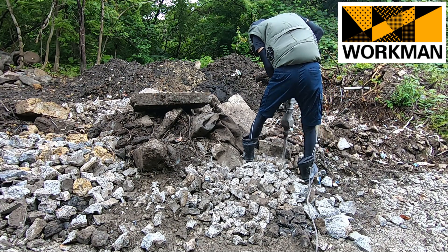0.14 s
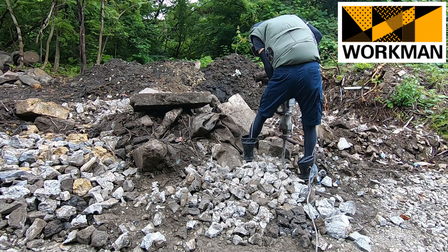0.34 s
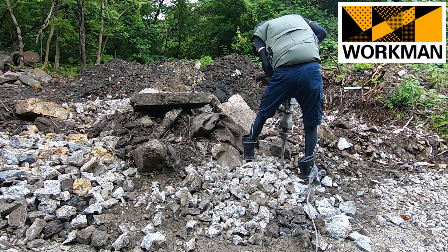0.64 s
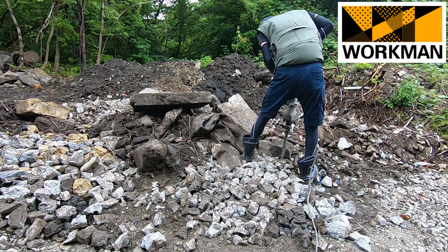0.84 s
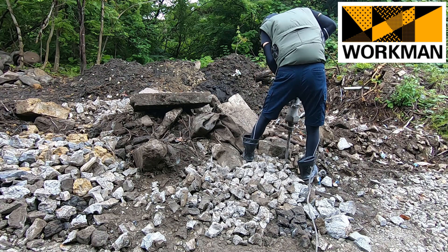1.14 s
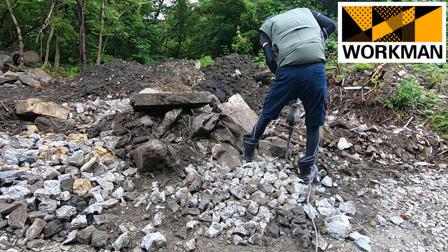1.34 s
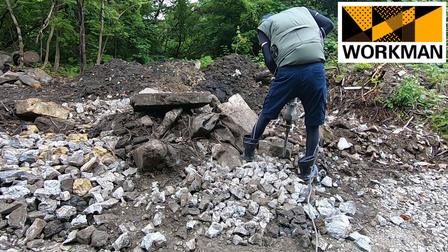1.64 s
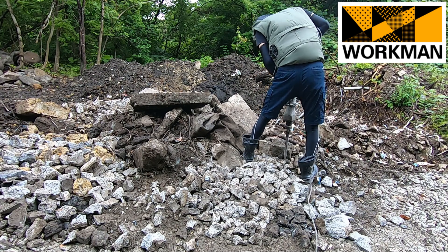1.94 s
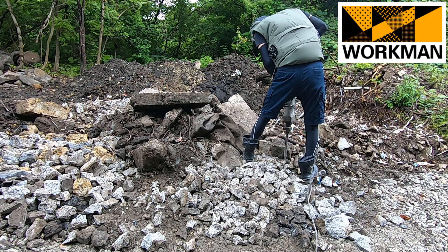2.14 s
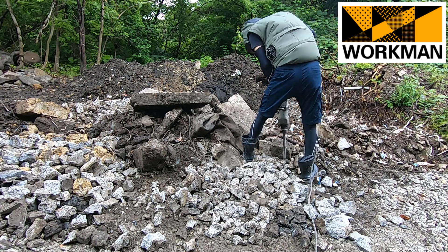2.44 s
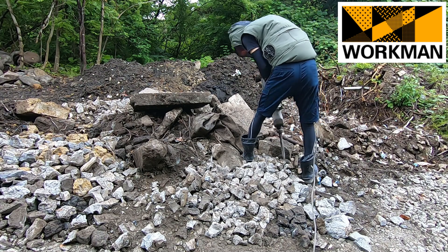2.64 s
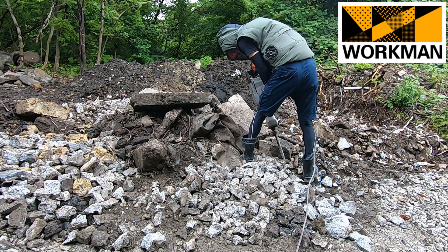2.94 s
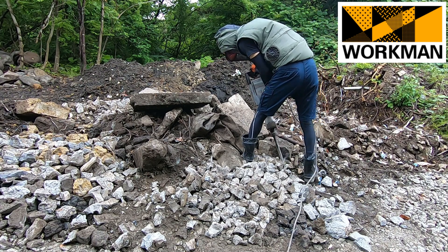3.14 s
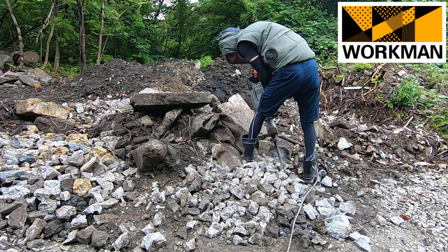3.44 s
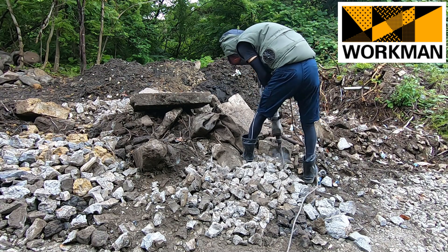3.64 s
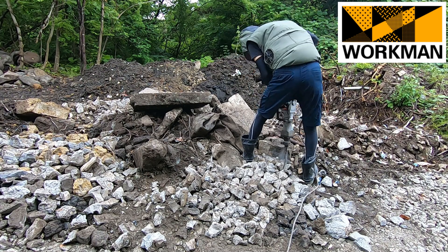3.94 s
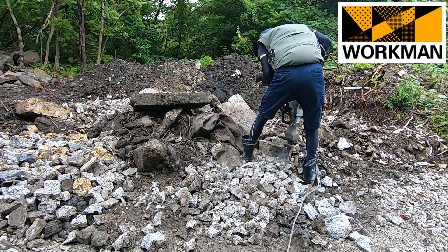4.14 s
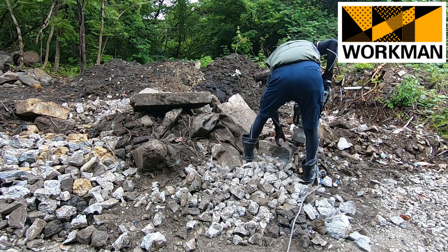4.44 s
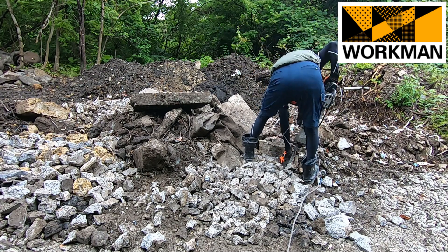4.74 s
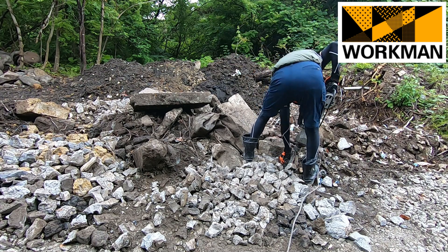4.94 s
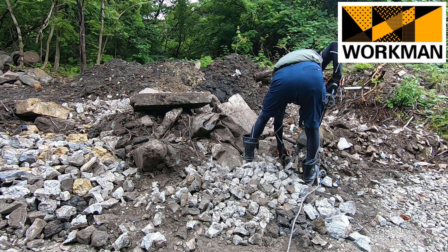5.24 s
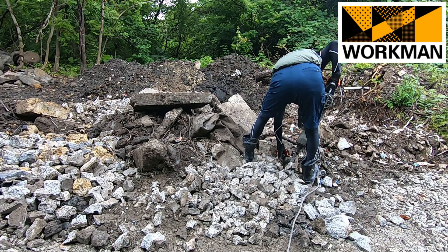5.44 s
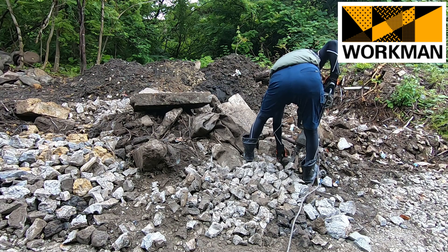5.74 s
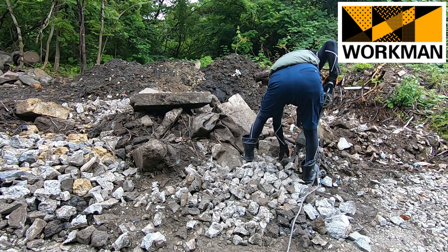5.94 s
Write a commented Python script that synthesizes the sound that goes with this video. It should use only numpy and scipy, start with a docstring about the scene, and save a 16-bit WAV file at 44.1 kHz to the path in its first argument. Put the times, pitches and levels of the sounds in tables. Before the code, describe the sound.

A demolition hammer cracks stone in two rapid bursts, its motor coasting down with spaced metallic knocks, over small fans whining in an outdoor rubble yard.

```python
"""Demolition hammer on stone

Two pulls of the trigger, the first already under way: the motor drives, strikes and coasts down in a rubble yard.
Each blow cracks on the stone, rings the chisel modes until the tip seats and thumps the ground.
Noise through gear case modes rattles, with fan rush, gear tones and growl; chips crackle as grain noise.
The fans of a cooling vest whine throughout, over background air; rubble and trees reflect the blows."""
import sys
import numpy as np
from scipy import signal
from scipy.fft import rfft, irfft
from scipy.io import wavfile

SR = 44100
rng = np.random.default_rng(int(sys.argv[2]) if len(sys.argv) > 2 else 0)


def log_audio(samples):
    """Write samples as a 16-bit WAV file to the path given in sys.argv[1]."""
    # one column per channel
    frames = np.atleast_2d(samples).T
    # limit to full scale, then quantise
    limited = np.clip(frames, -1, 1)
    pcm = np.round(limited * 32767).astype(np.int16)
    wavfile.write(sys.argv[1], SR, pcm)


N = 268992
TIME, FREQ = np.arange(N) / SR, np.fft.rfftfreq(N, 1 / SR)


def amp(db):
    """Decibels to amplitude."""
    return 10 ** (np.asarray(db) / 20)


def unit(x):
    """Scale to rms 1."""
    return x / np.sqrt(np.mean(x ** 2, -1, keepdims=True) + 1e-20)


def read(points, hz):
    """Read a (Hz, value) table along log frequency."""
    f, value = np.transpose(points)
    return np.interp(np.log(hz + 1), np.log(f + 1), value)


def curves(rows):
    """Each column after the first as a line through time."""
    s, *columns = np.transpose(rows)
    return [np.interp(TIME, s, c) for c in columns]


def colour(x, spectrum):
    """Filter by a (Hz, dB) table."""
    return irfft(rfft(x) * amp(read(spectrum, FREQ)), N)


def noise(spectrum):
    """Coloured noise of rms 1 as a (mid, side) pair."""
    return unit(colour(rng.standard_normal((2, N)), spectrum))


def drift(hz):
    """Smooth random curve of rms 1."""
    return unit(irfft(rfft(rng.standard_normal(N)) * np.exp(-(FREQ / hz) ** 2), N))


def flutter(hz):
    """Random curve of rms 1 in straight segments, rougher than drift."""
    knots = np.arange(0, N / SR + 1, 1 / 400)
    smooth = signal.lfilter([1], [1, -np.exp(-2 * np.pi * hz / 400)], rng.standard_normal(len(knots)))
    return unit(np.interp(TIME, knots, smooth))


def resonate(x, hz, width_hz):
    """One resonance driven by x, at rms 1."""
    return unit(signal.lfilter(*signal.iirpeak(hz, hz / width_hz, SR), x))


def add(mix, s, sound):
    """Add a sound in place from s seconds on."""
    part = mix[..., max(round(s * SR), 0):][..., :sound.shape[-1]]
    part += sound[..., :part.shape[-1]]


def grains(per_s, size_db, size_limit, decay_s):
    """Sparse decaying noise grains with exponentially spread dB levels."""
    size = np.minimum(rng.exponential(1, N), size_limit)
    snaps = (rng.random(N) < per_s / SR) * amp(size_db * size)
    envelope = signal.lfilter([1], [1, -np.exp(-1 / (decay_s * SR))], snaps)
    return envelope * rng.standard_normal((2, N))


# Pulls of the trigger. Each row: on in seconds, off in seconds, top speed in turns/s,
# coast-down time constant in seconds, time from off to standstill in seconds.
RUNS = [(-0.15, 0.603, 23.07, 2.054, 3.525), (2.873, 3.646, 22.0, 0.69, 2.1)]
SPIN_UP_S = 0.054
CREEP_PER_S = 0.46  # share of top speed
FULL_SPEED_HZ = 31.6  # reference crank speed


def crank_speed():
    """Turns/s: a jump and slow climb under power, then drag and friction brake the motor."""
    speed = np.zeros(N)
    for on, off, top, coast_s, stop_s in RUNS:
        spin_up = 1 - np.exp(-np.maximum(TIME - on, 0) / SPIN_UP_S)
        driven = spin_up * (1 - CREEP_PER_S * (off - TIME))
        friction = np.exp(-stop_s / coast_s)
        coasting = (np.exp(-np.maximum(TIME - off, 0) / coast_s) - friction) / (1 - friction)
        speed = np.maximum(speed, top * np.where(TIME < off, driven, coasting))
    return speed


def powered(rise_s, fall_s):
    """1 while the trigger is held, 0 otherwise, with soft edges."""
    gates = []
    for on, off, *_ in RUNS:
        rise = np.clip((TIME - on) / rise_s, 0, 1) ** 2
        gates.append(rise * np.exp(-np.maximum(TIME - off, 0) / fall_s))
    return sum(gates)


# Striker blows, one per crank turn. Each row: start in seconds, then relative levels: stone hit in dB,
# chisel ring in dB, ground thump in dB, bending (skew) in dB; last, time until the tip seats in seconds.
BLOWS = [(0.0388, -9, -13.5, -21.5, 6.5, 0.029), (0.0974, -11.5, -16, -21.5, -1, 0.043),
         (0.1518, -15.5, -16.5, -24.5, 7.5, 0.037), (0.2047, -15.5, -15.5, -21, 2, 0.018),
         (0.2563, -15.5, -17, -24, 7, 0.028), (0.3061, -12, -17.5, -25, 6, 0.015),
         (0.354, -13, -17.5, -27, -11, 0.014), (0.404, -26, -19, -40, -10, 0.019),
         (0.4956, -22.5, -17.5, -35, -7, 0.011), (0.5409, -14.5, -18, -31, 5, 0.055),
         (0.587, -40, -24.5, -34.5, -15, 0.014), (2.5626, -17.5, -13.5, -35, 3, 0.016),
         (2.7691, -14.5, -18.5, -32.5, -10, 0.017), (2.979, -13.5, -19, -29, 9, 0.014),
         (3.0557, -6, -14, -20, -5, 0.046), (3.1205, -9, -15, -19.5, -17, 0.04),
         (3.1786, -12.5, -16, -20, 5, 0.03), (3.2333, -11.5, -18.5, -20, 8, 0.043),
         (3.2867, -14, -16, -23, 10, 0.0079), (3.34, -15, -18.5, -22.5, 10, 0.08),
         (3.3887, -13, -18, -31.5, 9, 0.048), (3.438, -41, -30, -37, 0, 0.04),
         (3.4837, -14.5, -21, -31.5, 11.5, 0.027), (3.5305, -18, -25, -33, 10, 0.056),
         (3.578, -20, -25, -37, -5, 0.047), (3.621, -15.5, -21, -34.5, 5, 0.047),
         (3.662, -12, -19, -36.5, 8, 0.079), (3.7119, -17.5, -20, -31.5, 8, 0.044),
         (3.7666, -11.5, -18, -40, 9.5, 0.014), (3.8236, -17.5, -26, -43, -5, 0.018),
         (3.8767, -11, -16.5, -33, 7, 0.014), (3.939, -14.5, -16, -29.5, 7, 0.015),
         (4.009, -11, -16.5, -29, 14.5, 0.01), (4.0834, -11, -14, -27, 7, 0.014),
         (4.1707, -10.5, -19, -31, 14.5, 0.064), (4.2804, -12, -19.5, -33, -11, 0.017),
         (4.4026, -12.5, -21.5, -35, 17, 0.0053), (4.5425, -13, -19.5, -39.5, -11, 0.009),
         (4.716, -13.5, -20, -38.5, 9, 0.009), (4.9168, -13.5, -20.5, -38, -4, 0.0094),
         (5.175, -17.5, -25, -40, 0, 0.0076)]


def crank_angle(speed):
    """Crank angle in radians, a whole number of turns at every blow."""
    turns, times = np.cumsum(speed) / SR, [row[0] for row in BLOWS]
    slip = np.unwrap(np.interp(times, TIME, turns), period=1)
    return 2 * np.pi * (turns - np.interp(TIME, times, slip))


# The loose tip bumps the stone without the striker. Each row: start in seconds, then relative levels:
# stone hit in dB, chisel ring in dB, ground thump in dB.
BUMPS = [(0.5012, -17.5, -39, -31), (0.5096, -34, -40, -34), (0.5436, -28, -39, -43),
         (2.269, -33, -38, -64), (2.362, -30, -54, -52), (2.427, -37, -58, -43.5), (3.408, -27, -26, -51),
         (3.4913, -21, -36, -37), (3.67, -33, -34, -44), (3.9487, -34, -27, -37), (4.214, -27, -32, -37),
         (5.313, -25.5, -63, -70)]
BUMP_FREE_S = 0.0064


def hits():
    """Every tip contact, with the crank speed at that moment as a last column."""
    speed = crank_speed()
    rows = BLOWS + [(*row, 0, BUMP_FREE_S) for row in BUMPS]
    return [(*row, speed[round(row[0] * SR)]) for row in rows]


# Spectra of a crack and a duller knock on stone. Each row: frequency in Hz, relative level in dB per Hz.
CRACK = [(60, -30), (500, 2), (2500, -29), (4200, 7), (5000, 10.5), (6200, 7), (8000, -1.5), (9000, -6),
         (11500, -16.5), (14000, -32), (16000, -51)]
KNOCK = [(30, -52), (100, -16), (300, 3), (550, 7.5), (800, 0.5), (1500, 3.5), (3200, 7), (4500, -2),
         (8000, -72)]


def first_contact(snap_db=-3, tap_db=5, delay_s=0.00082):
    """Steel meeting stone starts each hit with one clean tick, plus a duller tap when the blow is slow."""
    snaps, taps = np.zeros((2, N)), np.zeros((2, N))
    for s, level_db, *_, speed in hits():
        at = round((s + delay_s) * SR)
        snaps[0, at] = amp(level_db + snap_db)
        taps[0, at] = amp(level_db + tap_db) * (1 - speed / FULL_SPEED_HZ)
    return colour(snaps, CRACK) + colour(taps, KNOCK)


CRUSH_RISE_S = 0.00018


def stone(knock_db=-11.5, crack_db=-8.0, slow_knock_db=4, slow_crack_db=-5, burst_s=0.0032,
          grit_db=-19, grit_s=0.0022, chatter_db=-10, fast_chatter_db=-4, chatter_s=0.0088,
          looseness=1.0, ragged_db=3, lowest_hz=260):
    """The tip crushes stone for milliseconds; landing without weight, it chatters on the loose surface."""
    t = np.arange(SR // 10) / SR
    rise = 1 - np.exp(-t / CRUSH_RISE_S)
    crush = np.exp(-(t / burst_s) ** 2) + amp(grit_db) * np.exp(-t / grit_s)
    settle = t / chatter_s * np.exp(-(t / chatter_s) ** 2)
    ragged = amp(ragged_db * drift(270))
    knock, crack = np.zeros((2, N))
    for s, level_db, _, thump_db, *_, speed in hits():
        slow = 1 - speed / FULL_SPEED_HZ  # slow blows knock more and crack less
        lightness_db = looseness * np.clip(-27.5 - thump_db, -12, 5)
        chatter_level = amp(chatter_db + lightness_db + fast_chatter_db * (-0.5 - slow))
        chatter = chatter_level * settle * ragged[round(s * SR):][:len(t)]
        burst = rise * (crush + chatter)
        add(knock, s, amp(level_db + knock_db + slow_knock_db * slow) * burst)
        add(crack, s, amp(level_db + crack_db + slow_crack_db * slow) * burst)
    # so small a patch of stone radiates no bass
    no_bass = signal.butter(3, lowest_hz, "high", fs=SR, output="sos")
    return signal.sosfilt(no_bass, knock * noise(KNOCK) + crack * noise(CRACK))


# Pitch range of struck spots: lowest in Hz, highest in Hz.
SPOT_HZ = (900, 4800)


def spots(spot_db=-13, spot_t60_s=0.02, count=3):
    """The tip wanders over the stone, so every hit rings a few short modes of its own."""
    t, out = np.arange(SR // 20) / SR, np.zeros((2, N))
    for s, level_db, *_ in hits():
        envelope = amp(level_db + spot_db - 60 * t / spot_t60_s) * (1 - np.exp(-t / 0.000073))
        for hz in np.exp(rng.uniform(*np.log(SPOT_HZ), count)):
            add(out, s, envelope * np.sin(2 * np.pi * (hz * t + rng.random((2, 1)))))
    return out


# Lengthwise and bending chisel modes. Each row: frequency in Hz, relative level in dB, factor on ring time.
CHISEL = [(7350, -2, 0.99), (7800, -18, 0.76), (7156, -1.5, 0.24), (7880, -14.5, 0.11), (10300, -29, 0.47),
          (13300, -33, 0.2), (15200, -58, 1)]
BENDING = [(5020, -12.5, 0.17), (4830, -10.5, 0.1)]
# The grip of the stone tunes each ring: spread between blows, sag as the tip withdraws, waver.
GRIP_HZ, SAG_HZ_PER_S, WAVER_HZ = 40, 3000, 55


def chisel(ring_db=1, slow_ring_s=0.052, fast_ring_s=0.51, seat_db=-13, contact=0.55, pressed_db=4,
           pressed_s=0.0061, pressed_hz=130, scatter_hz=24, bend_scatter_hz=125, rock_db=2):
    """Steel modes ring louder and sharper while pressed, damp as the tip seats; skew blows bend it too."""
    t, out = np.arange(SR // 5) / SR, np.zeros((2, N))
    pressed, waver, rocking = np.exp(-t / pressed_s), drift(123), flutter(70)
    onset = 1 - np.exp(-t / 0.00036)
    for s, hit_db, level_db, _, skew_db, free_s, speed in hits():
        here = slice(round(s * SR), round(s * SR) + len(t))
        # at speed the steel bounces clear and rings on
        t60_s = slow_ring_s * (fast_ring_s / slow_ring_s) ** (speed / FULL_SPEED_HZ)
        seated = 1 - np.exp(-(t / free_s) ** 6)
        sag_hz = SAG_HZ_PER_S * (free_s / 2 - np.minimum(t, free_s))
        grip_hz = GRIP_HZ * rng.standard_normal() + sag_hz + WAVER_HZ * waver[here]
        rock = rock_db * rocking[here] * (1 - pressed)  # the loose steel rocks in its holder
        # modes that the stone damps most are detuned most by it; the longest-ringing modes grow quieter the
        # harder the hit is against the ring
        modes = [(hz, db, lasting, scatter_hz / lasting ** 0.71) for hz, db, lasting in CHISEL]
        modes += [(hz, db + skew_db, lasting, bend_scatter_hz) for hz, db, lasting in BENDING]
        for hz, db, lasting, spread_hz in modes:
            pitch_hz = hz + grip_hz + spread_hz * rng.standard_normal() + pressed_hz * pressed
            wave = np.sin(2 * np.pi * (np.cumsum(pitch_hz) / SR + rng.random((2, 1))))
            decay_db = pressed_db * pressed + seat_db * seated + rock - 60 * t / (t60_s * lasting)
            mode_db = level_db + contact * lasting * (level_db - hit_db) + ring_db + db
            add(out, s, amp(mode_db + decay_db) * onset * wave)
    return out


# Rumble spectrum. Each row: frequency in Hz, relative level in dB per Hz.
GROUND = [(20, -35), (40, -15), (70, 0.5), (130, 5.5), (250, -6), (400, -25), (900, -54)]
# each thump meets another part of the block: spread of pitch, of length (share)
THUMP_SPREAD_HZ, THUMP_SPREAD = 9, 0.07


def ground(thump_db=8.5, thump_hz=197, drop_hz_per_db=3.5, crest_s=0.0056, sharpness=5.05, sag=0.069,
           rumble_db=-9.0, rumble_s=0.031, heavy=0.17):
    """The struck block heaves a couple of cycles just after the crack; the rubble bed rumbles on."""
    t, out, shake = np.arange(SR // 5) / SR, np.zeros((2, N)), np.zeros(N)
    for s, _, _, level_db, *_ in hits():
        u = t / (crest_s * np.exp(THUMP_SPREAD * rng.standard_normal()))
        heave = (u * np.exp(1 - u)) ** sharpness
        weight_db = level_db + 26
        # heavy blows move more stone and sound lower
        hz = thump_hz - drop_hz_per_db * weight_db + THUMP_SPREAD_HZ * rng.standard_normal()
        phase = 2 * np.pi * hz * (t - 0.878 * crest_s) * (1 - sag * np.tanh(u - 1))
        add(out, s, amp(level_db + thump_db) * heave * np.array([np.cos(phase), np.sin(phase)]))
        # heavy blows shake the bed disproportionately
        shake_level = amp(level_db + rumble_db + heavy * weight_db)
        add(shake, s, shake_level * (1 - np.exp(-u ** 2)) * np.exp(-t / rumble_s))
    return out + shake * noise(GROUND)


def piston_stroke(angle, slack_lag=0.13, lopsided=0.2, compression=0.43, compression_lead=0.48):
    """Two swells per turn; under power the piston also labours on the air cushion before each blow."""
    halves = np.cos(2 * (angle - slack_lag)) * (1 - .5 * powered(0.091, 0.091))
    cushion = compression * powered(0.16, 0.51) * np.cos(angle + compression_lead)
    return lopsided * np.cos(angle) - halves + cushion


# Gear case modes. Each row: frequency in Hz, width in Hz, relative level in dB.
CASE = [(740, 160, -14), (1102, 130, -9), (1657, 120, -6.5), (1950, 69, -11), (2274, 34, -2.5),
        (2368, 72, 2.5), (2590, 120, -4), (2900, 70, -0.5), (3074, 90, 1), (3170, 78, -4.5), (3435, 52, -8),
        (3760, 99, -7.5), (4174, 45, -8.5), (4890, 110, -8), (5750, 220, -4.5)]
SHIFTING_DB, GRAIN_DB = 2.3, 1.4  # spread of mode shares, of single teeth


def case_rattle(clatter_per_s=3000, bite_db_per_octave=13.0):
    """Dense random tooth contacts ring the gear case; rms 1."""
    tooth_size = amp(GRAIN_DB * np.minimum(rng.exponential(1, N), 4))
    teeth = (rng.random(N) < clatter_per_s / SR) * tooth_size * rng.standard_normal((2, N))
    # under power the teeth bite harder and reach the higher modes
    bite = bite_db_per_octave * powered(0.57, 1.0)
    case = np.zeros((2, N))
    for hz, width_hz, db in CASE:
        # the contact wanders, so the modes take turns
        share_db = db + SHIFTING_DB * flutter(37.0) + bite * np.log2(hz / 2400)
        case += amp(share_db) * resonate(teeth, hz, width_hz)
    tilt = [(100, -35), (400, 7.0), (4300, -6.0), (6000, -11.0), (8000, -40), (14000, -34)]
    return unit(colour(case, tilt))


# Gear mesh tones. Each row: multiple of crank speed, relative level in dB.
MESH = [(58, -17), (116, -12), (174, -12), (232, -15)]
ARMATURE_RATIO = 9.67  # armature turns per crank turn
BACKLASH = 0.006  # rms share of speed
LOW_ORDER_DB = 7  # the small housing radiates the lowest armature tone this much less


def whine(speed, orders_db=-16):
    """Gear mesh tones and a comb of armature orders glide with speed, blurred by backlash."""
    turns = np.cumsum(speed * (1 + BACKLASH * drift(90))) / SR
    lines = MESH + [(k * ARMATURE_RATIO, orders_db - LOW_ORDER_DB / (k - 1)) for k in range(2, 26)]
    tones = sum(amp(db + 3 * flutter(8)) * np.sin(2 * np.pi * (k * turns + rng.random()))
                for k, db in lines)
    return np.minimum(speed / 17, 1) ** 2 * np.array([tones, np.roll(tones, SR // 300)])


# Fan rush spectrum. Each row: frequency in Hz, relative level in dB per Hz.
RUSH = [(30, -46), (100, -25), (170, -10), (300, -2.5), (600, 2), (1500, 2), (3500, -1), (5500, -4),
        (7000, -8), (9800, -15), (11200, -31.5), (14000, -35), (16000, -46)]
# Openness of the tool past the worker's body. Each row: time in seconds, level in dB.
EXPOSURE = [(0, -6.5), (0.36, -9), (0.52, 1), (2.86, 4), (2.96, 3.5), (3.64, 2.5), (4.0, 1), (5.3, -0.5)]
# Looseness of the gears. Each row: time in seconds, rattle level in dB.
SLACK = [(0, -5), (0.6, -13), (0.9, -2.5), (1.3, 7), (2.4, 3.5), (2.7, -2), (2.86, -0.5), (3.1, -2),
         (3.62, 8), (4.02, -4), (4.58, 8.5), (5.0, 8.5), (5.4, 9)]
KICK_DB, KICK_S = 16, 0.16  # switching on kicks the gears about
UNEVEN_DB, STROKE_DB = 1.0, 3.2  # rattle: rms spread of level, swell per unit of stroke
HALF_LEVEL_SPEED_HZ = 0.78  # tool fades out around this crank speed


def motor(rush_db=-32.0, rattle_db=-38.5, whine_db=-32, rush_db_per_decade=18.0, brushes_db=0.0,
          rattle_db_per_decade=8, rush_stroke_db=1.0, rush_lull=0.56, turning_db=-4, turning_width=0.32):
    """Fan rush follows speed; the gears whine, and rattle in two swells per turn, with a lull at the far end of
    the stroke."""
    speed = crank_speed()
    angle = crank_angle(speed)
    (exposure_db,), (slack_db,) = curves(EXPOSURE), curves(SLACK)
    decades = np.log10(speed / FULL_SPEED_HZ + 1e-3)
    kick = sum(np.interp((TIME - on) / KICK_S, [0, .2, .55, .95, 1.15], [0, .55, .9, 1, 0])
               for on, *_ in RUNS)
    running = speed ** 2 / (speed ** 2 + HALF_LEVEL_SPEED_HZ ** 2)
    stroke = piston_stroke(angle)
    # the gears run free for an instant at the far end of the stroke
    lull_db = turning_db * np.exp(-(1 + np.cos(angle)) / turning_width ** 2)

    rattle_level_db = exposure_db + rattle_db_per_decade * decades + slack_db + KICK_DB * kick + rattle_db
    rattle_swing_db = STROKE_DB * stroke + lull_db + UNEVEN_DB * drift(64)
    rattle = amp(rattle_level_db + rattle_swing_db) * case_rattle()

    rush_swing_db = rush_stroke_db * stroke + rush_lull * lull_db + 0.66 * drift(190)
    rush = unit(noise(RUSH) * amp(rush_swing_db))
    spin_db = exposure_db + rush_db_per_decade * decades + brushes_db * powered(0.086, 0.1)
    return running * (rattle + amp(spin_db) * (amp(rush_db) * rush + amp(whine_db) * whine(speed)))


# Load of the air cushion on the gears. Each row: time in seconds, level in dB.
LOAD = [(0, -23), (0.36, -8), (0.48, 1), (0.54, -3), (0.7, 0.5), (1.1, -25), (2.9, -13), (3.05, 3),
        (3.4, -2), (3.62, 7.5), (3.84, 1), (3.93, 1), (4.1, -29), (4.4, -29)]
# Growl spectrum. Each row: frequency in Hz, relative level in dB per Hz.
GROWL = [(200, -40), (600, -12), (1000, -4), (1350, 1.5), (1800, 3), (2400, -9), (3300, -3), (4500, -12),
         (7000, -28), (12000, -56)]


def labour(growl_db=-29, lead=0.89, squeeze_db=11, tooth_db=2, uneven_db=0.0):
    """Loaded gears growl as the piston squeezes air before each blow, throbbing with armature turns."""
    speed, (load_db,) = crank_speed(), curves(LOAD)
    angle = crank_angle(speed)
    squeeze = squeeze_db * (np.cos(angle + lead) - 1)
    throb = tooth_db * np.cos(ARMATURE_RATIO * angle) + uneven_db * flutter(60)
    return amp(growl_db + load_db + squeeze + throb) * noise(GROWL) * speed / FULL_SPEED_HZ


# The housing rings sharply as the motor is kicked back to speed, softly as the slack gears coast.
# Each row: start in seconds, relative level in dB, t60 in seconds.
CLACKS = [(2.972, -13, 0.018), (3.012, -18, 0.022), (3.0183, -9, 0.015), (3.03, -10, 0.016),
          (3.0377, -16, 0.033), (3.05, -19.5, 0.047), (3.104, -27, 0.048), (3.468, -21, 0.038),
          (4.502, -43, 0.044), (4.605, -31.5, 0.066), (4.668, -40, 0.057), (4.785, -35, 0.06),
          (4.842, -51, 0.079), (4.966, -43, 0.056), (4.986, -37, 0.092)]
# A hard tooth contact favours the lower case modes. Each row: frequency in Hz, gain in dB.
CLACK_COLOUR = [(1500, 1), (2300, 10), (2950, -11), (3400, 6), (6000, -4)]


def clacks(clack_db=-1):
    """Single hard tooth contacts ring the modes of the gear case."""
    t, out = np.arange(SR // 10) / SR, np.zeros((2, N))
    for s, level_db, t60_s in CLACKS:
        ring = sum(amp(db) * np.sin(2 * np.pi * (hz * t + rng.random((2, 1)))) for hz, _, db in CASE)
        add(out, s, amp(level_db + clack_db - 60 * t / t60_s) * (1 - np.exp(-t / 0.0042)) * ring)
    return colour(out, CLACK_COLOUR)


# Snapping chips. Each row: frequency in Hz, gain in dB.
CHIPS = [(200, -7.5), (600, -43), (1300, -18), (2500, 1), (5000, -3), (7000, -1.5), (10000, -18.5),
         (11500, -27.5), (14000, -27), (16000, -45)]


def crumble(grind_db=-37.5, facing=0.89, spill_db=-37, spill_s=0.094, chips_per_s=750, size_db=7.5,
            chip_s=0.0031):
    """Chips grind round the tip under power and spill after each blow: a crackle of very short grains."""
    exposure_db, = curves(EXPOSURE)
    level, t = amp(grind_db + facing * exposure_db) * powered(0.1, 0.042), np.arange(SR // 2) / SR
    for s, hit_db, *_ in BLOWS:
        add(level, s, amp(spill_db + hit_db) * np.exp(-t / spill_s))
    return level * unit(colour(grains(chips_per_s, size_db, 4, chip_s), CHIPS))


# Chips landing on the rubble. Each row: start in seconds, level per partial pair in dB, ring in Hz.
PEBBLES = [(0.6228, -23, 5600), (0.6675, -20, 4950), (0.7135, -23, 4260), (0.7242, -22, 5100),
           (1.0052, -24, 3770)]
# Grit trickling down the heap. Each row: time in seconds, level in dB.
TRICKLE = [(0.3, -72), (0.55, -62), (0.66, -36.5), (0.9, -40), (1.1, -42), (1.5, -54), (2.4, -73)]
# Grit colour. Each row: frequency in Hz, gain in dB.
GRIT = [(300, -34), (1500, 0), (3000, -2), (5000, 4.5), (6200, -5), (7500, -12), (10000, -32), (12000, -36),
        (16000, -48)]


def debris(pebble_db=0, pebble_t60_s=0.011, trickle_db=0):
    """Single chips tick on the rubble as inharmonic rings; grit trickles as a fine crackle."""
    t, (level_db,) = np.arange(SR // 40) / SR, curves(TRICKLE)
    out = amp(level_db + trickle_db) * unit(colour(grains(700, 4.5, 3.5, .0004), GRIT))
    for s, pebble_level_db, hz in PEBBLES:
        ring = sum(np.sin(2 * np.pi * (hz * ratio * t + rng.random((2, 1))))
                   for ratio in (.48, .71, 1, 1.23)) / 2
        add(out, s, amp(pebble_level_db + pebble_db - 60 * t / pebble_t60_s) * ring)
    return out


# Decay of the yard and trees. Each row: frequency in Hz, t60 in seconds.
YARD = [(100, 0.2), (1000, 0.1), (7000, 0.58), (14000, 0.45)]


def yard(x, trees_db=5.5, trees_s=0.078, trees_spread_s=0.03):
    """Sparse rubble reflections, then a cluster from the tree edge; each band dies at its own speed."""
    taps = rng.standard_normal((2, SR // 2)) * (rng.random((2, SR // 2)) < 2000 / SR)
    taps[:, :round(.008 * SR)] = 0
    hz, t, z = signal.stft(taps, SR, nperseg=256)
    trees = trees_db * np.exp(-((t - trees_s) / trees_spread_s) ** 2)
    decay_db = trees - 60 * t / read(YARD, hz)[:, None]
    tail = signal.istft(z * amp(decay_db), SR, nperseg=256)[1]
    return signal.fftconvolve(x[:1], tail / np.linalg.norm(tail[0]), axes=1)[:, :N]


# Vest fan blade tone, then overtones. Each row: frequency in Hz, relative level in dB.
FAN_TONES = [(817, -57.5), (1638, -66.5), (3274, -76)]
# Intake hum: width in Hz, relative level in dB.
INTAKE = (34, -48.5)
# How the fans face the listener. Each row: time in seconds, overtone gain in dB, intake gain in dB,
# intake pitch in Hz.
FACING = [(0, 0, -8.5, 650.3), (2.2, 17.5, 4, 644.5), (3.2, 20, -4.5, 604), (4.6, 12, -34, 595),
          (5.1, 10, -1, 574.6), (6.1, 5.5, 2, 575)]
# above this pitch the hum breaks up into noise, fully so one span higher
CLEAR_HUM_HZ, BLUR_SPAN_HZ = 580, 85


def vest(blurred_hz=80, blade_top_db=1.5, blade_share=1.0):
    """Small fans: a wavering blade tone with overtones, and air humming in the intake."""
    overtone_db, intake_db, intake_hz = curves(FACING)
    blade_db = blade_top_db + blade_share * intake_db
    clock_s = np.cumsum(1 + 0.001206 * drift(4.9)) / SR
    tones = np.zeros((2, N))
    for k, (hz, db) in enumerate(FAN_TONES):
        tone_db = db + (overtone_db if k else blade_db) + 0.75 * drift(44)
        tones += amp(tone_db) * unit(np.sin(2 * np.pi * (hz * clock_s + rng.random((2, 1)))))

    width_hz, hum_db = INTAKE
    turn = np.exp(2j * np.pi * np.cumsum(intake_hz + 13 * drift(8.33)) / SR)

    def band(hz):
        return np.array([((drift(hz) + 1j * drift(hz)) * turn).real for _ in range(2)])

    blur = np.clip((intake_hz - CLEAR_HUM_HZ) / BLUR_SPAN_HZ, 0, 1)
    hum = np.sqrt(1 - blur) * band(width_hz) + np.sqrt(blur) * band(blurred_hz)
    return tones + amp(hum_db + intake_db) * hum


# Background air spectrum. Each row: frequency in Hz, relative level in dB per Hz.
AIR = [(15, -69), (25, -42), (96, -54), (130, -26.5), (190, -15.5), (300, -25.5), (480, -13), (700, -11.5),
       (880, -16), (1170, -12.5), (2060, -16.5), (3340, -16.5), (6720, -25), (10000, -37), (11500, -63),
       (15500, -68)]


def background_air(level_db=-45.5):
    """Coloured noise with a slightly drifting level."""
    return amp(level_db + .5 * drift(7.9)) * noise(AIR)


# Stereo width. Each row: frequency in Hz, side gain in dB.
WIDTH = [(30, 9), (70, -14), (200, -19.5), (400, -17), (700, -16.5), (1300, -11), (2400, -16),
         (4500, -12.5), (7400, -5.5), (9000, 2.5), (15000, -0.5)]
# Stereo lean. Each row: frequency in Hz, left-right gain in dB.
LEAN = [(60, 0.5), (150, -0.5), (380, 0), (950, -3.5), (2380, -1.5), (5980, -1.5), (15000, 2)]


def scene(yard_db=-16):
    """All sources as mid and side, then left and right."""
    blows = first_contact() + stone() + spots() + chisel() + ground()
    tool = motor() + labour() + clacks()
    rubble = crumble() + debris()
    mid, side = blows + amp(yard_db) * yard(blows) + rubble + tool + vest() + background_air()
    side = colour(side, WIDTH)
    lean = amp(read(LEAN, FREQ) / 2)
    return irfft(rfft(np.array([mid + side, mid - side])) * np.array([lean, 1 / lean]), N)


EDGE_HZ = 15450


def record(dry, ceiling=0.73):
    """Soft saturation rounds off the loudest peaks; then the band limit."""
    rounded = ceiling * np.tanh(dry / ceiling)
    lowpass = signal.firwin(255, EDGE_HZ, window=("kaiser", 8), fs=SR)
    return signal.oaconvolve(rounded, lowpass[None], "same")


dry = scene()
out = record(dry)
log_audio(out)
```